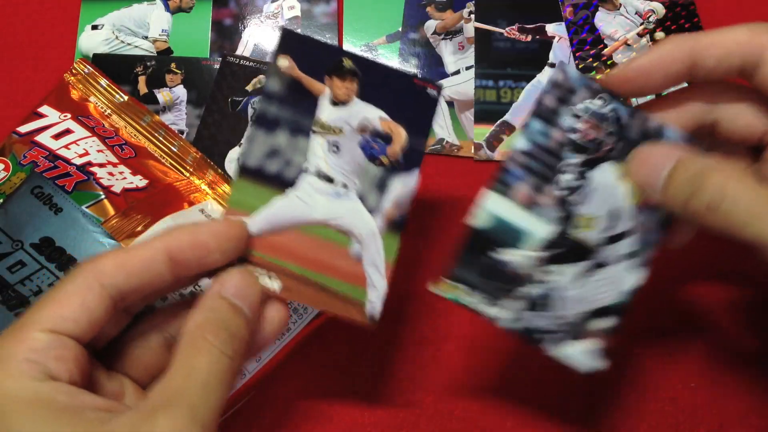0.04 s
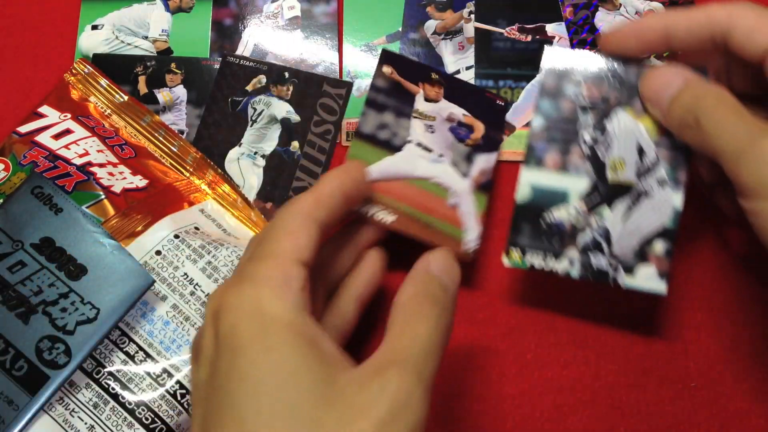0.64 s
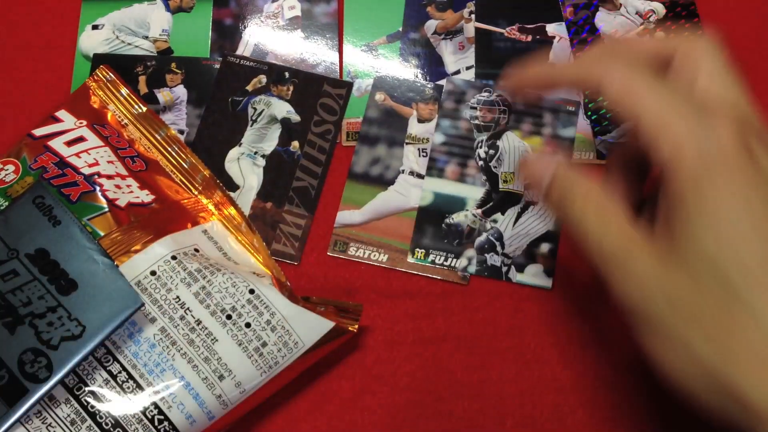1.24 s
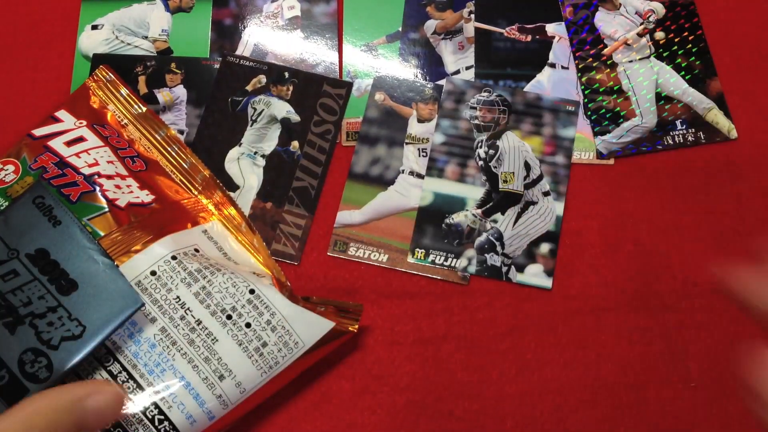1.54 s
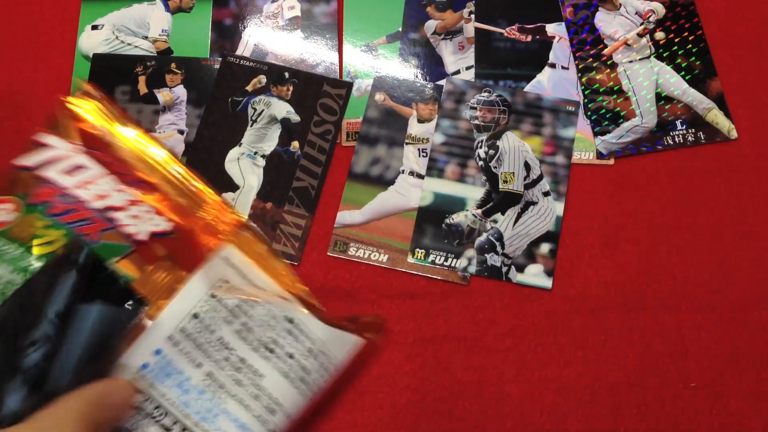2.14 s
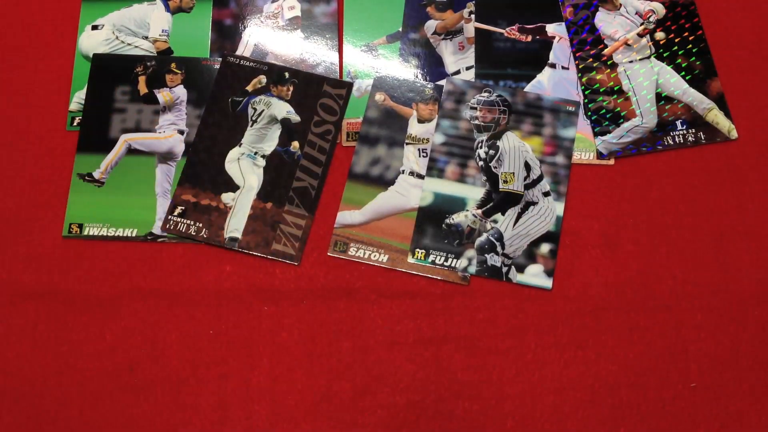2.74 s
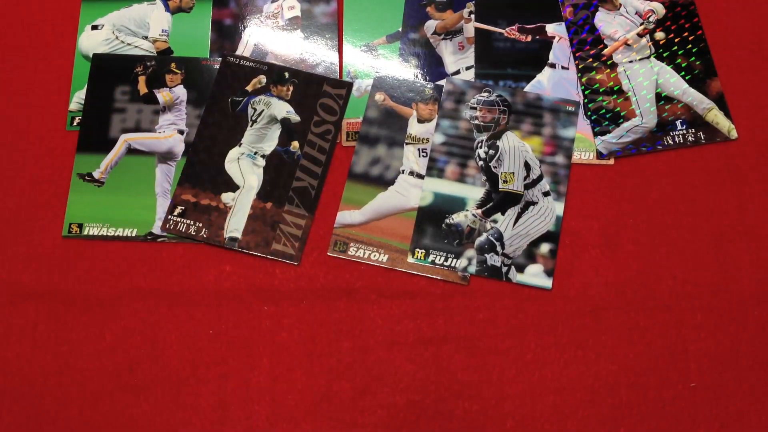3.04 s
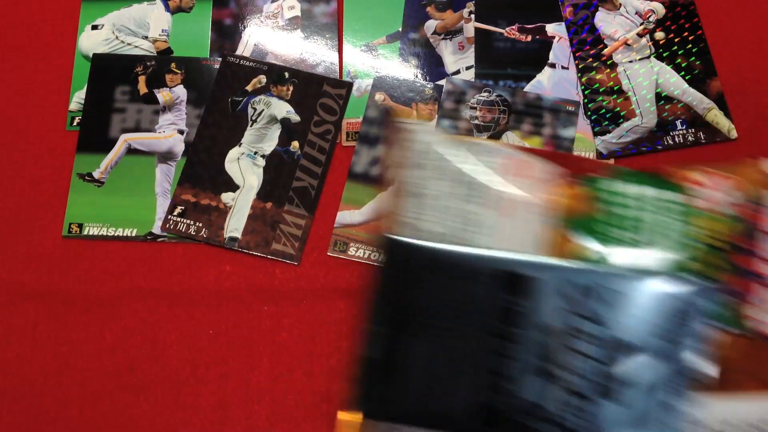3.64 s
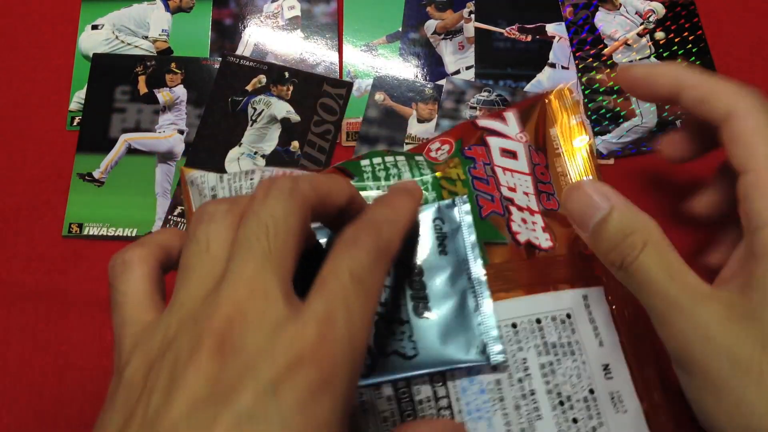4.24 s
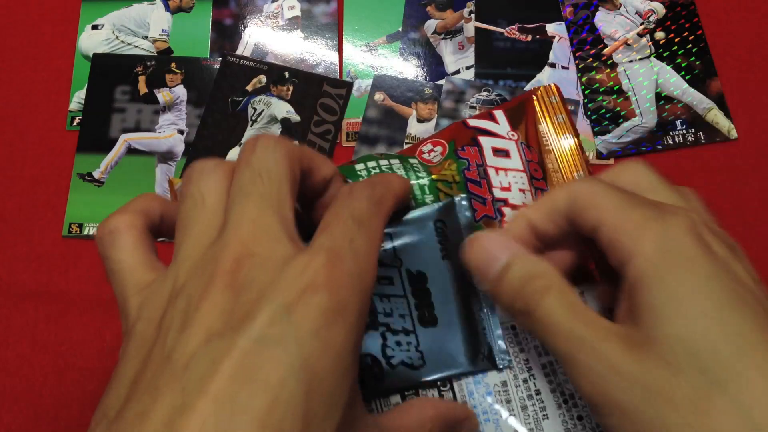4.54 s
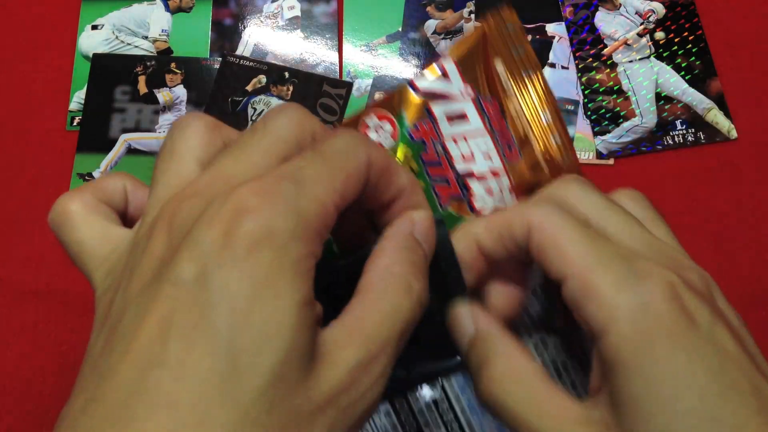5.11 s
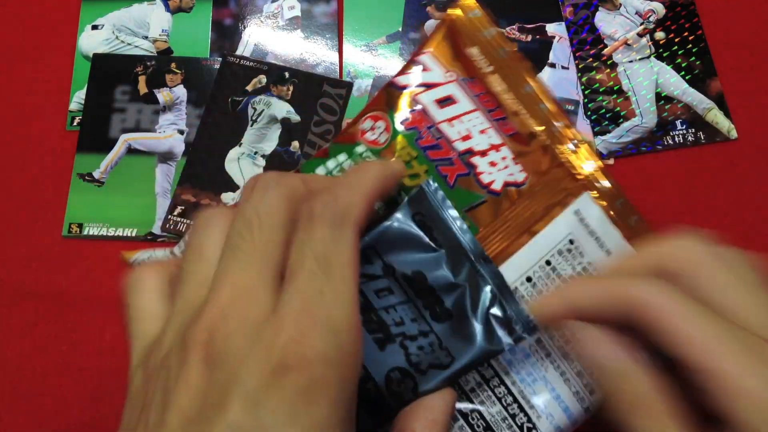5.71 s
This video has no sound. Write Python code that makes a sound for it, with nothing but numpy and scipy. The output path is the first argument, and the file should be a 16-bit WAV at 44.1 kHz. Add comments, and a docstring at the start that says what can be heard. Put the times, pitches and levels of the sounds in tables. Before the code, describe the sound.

Trading cards scrape and tap on a cloth-covered table, then a snack bag and foil packet crackle in someone's hands.

```python
"""Two trading cards scrape, squeak faintly and tap down on a cloth-covered table. A snack bag crackles in the
hands; at 2.476 s the crackle stops dead, echo and all, and later the hands crackle it again and pick at the
foil packet stuck to it. Creases in the film pop through one by one and ring the panel around them, over a fine
rustle of tiny slips. While the crackle is silent, a few knocks come from farther off in the small, quiet room.
Soft bumps on the table, a brief faint whistle and a low hiss lie underneath."""
import sys
import numpy as np
from scipy import signal
from scipy.fft import rfft, irfft, next_fast_len
from scipy.io import wavfile
from scipy.ndimage import uniform_filter1d

SR = 44100
rng = np.random.default_rng(int(sys.argv[2]) if len(sys.argv) > 2 else 0)


def dump(signal):
    """Clip the signal to [-1, 1] and save it as 16-bit WAV at the path in sys.argv[1]."""
    limited = np.clip(np.atleast_2d(signal).T, -1, 1)
    pcm = np.round(limited * 32767).astype(np.int16)
    wavfile.write(sys.argv[1], SR, pcm)


N = 258867
TIME = np.arange(N) / SR

# Hands and bag bump the table. Each row: start in seconds, level in dB, pitch in Hz.
TABLE_BUMPS = [(.952, -56.5, 167), (2.185, -56.5, 122), (2.338, -54.5, 122), (2.446, -58, 111),
               (5.211, -65, 135)]
# Fingers grip or push the film. Each row: start and length in seconds, then the relative levels
# in dB of the body (the lower rustle) and the fizz (the higher rustle).
FINGER_STROKES = [(1.576, 0.066, -50.5, -60), (1.69, 0.058, -67.5, -65.5), (1.743, 0.04, -54, -53),
                  (1.804, 0.065, -64, -69), (1.911, 0.09, -65, -62), (2.018, 0.18, -57, -58),
                  (2.16, 0.051, -47.5, -48.5), (2.227, 0.11, -56, -53), (2.331, 0.13, -55, -53.5),
                  (3.608, 0.016, -62, -74), (3.772, 0.09, -64, -68), (3.869, 0.045, -54, -57.5),
                  (4.029, 0.12, -72.5, -65), (4.152, 0.13, -50.5, -50.5), (4.311, 0.033, -67, -64),
                  (4.442, 0.114, -55, -64), (4.575, 0.04, -58, -48), (4.639, 0.15, -60.5, -63.5),
                  (4.804, 0.0507, -59.5, -64), (4.887, 0.18, -64.5, -70), (5.08, 0.054, -55.5, -53.5),
                  (5.138, 0.135, -54, -53), (5.363, 0.018, -52.5, -53), (5.411, 0.052, -57, -62.5),
                  (5.592, 0.021, -47, -60), (5.619, 0.055, -56, -57), (5.691, 0.04, -47, -46),
                  (5.83, 0.031, -70, -65)]


def amp(db):
    """Turns decibels into a factor to multiply by."""
    return 10 ** (np.asarray(db) / 20)


def evened(x):
    """Scales a signal to an average power of one."""
    return x / np.sqrt(np.mean(x ** 2) + 1e-20)


def value_at(points, hz):
    """Reads a curve at hz, along a logarithmic frequency axis."""
    freqs, values = np.transpose(points)
    return np.interp(np.log(hz + 1), np.log(freqs + 1), values)


def colour(x, points):
    """Makes each frequency louder or softer, following (Hz, dB) points."""
    size = next_fast_len(N + 4096)
    gain = amp(value_at(points, np.fft.rfftfreq(size, 1 / SR)))
    return irfft(rfft(x, size) * gain, size)[:N]


def add(mix, start, sound):
    """Mixes a sound in at a start given in seconds."""
    part = mix[round(start * SR):][:len(sound)]
    part += sound[:len(part)]


def gesture(start, length, attack_s, release_s):
    """A movement builds up, lasts until its length is over and dies away."""
    age = TIME - start
    rise = np.clip(age / attack_s, 0, 1)
    return rise * np.exp(-np.clip(age - length, 0, 30 * release_s) / release_s)


def background(level_db, waver_db, size=4096):
    """Low room noise and microphone hiss, wavering slightly and slowly swelling."""
    # The quiet room's tone. Each row: frequency in Hz, relative level in dB.
    air_tone = [(25, -31), (60, -26.5), (110, -15), (160, -8.5), (250, -7), (420, -11), (600, -13),
                (740, -17), (1050, -15.5), (1400, -16.5), (1900, -21.5), (2700, -22), (8000, -27),
                (9300, -29), (11000, -31.5), (14800, -23), (16000, -25)]
    # The room hiss slowly grows louder from start to end. Each row: time in seconds, boost in dB.
    swell = [(0, 0), (1.5, 0.5), (2.75, 2.5), (3.55, 5.5), (5.87, 7.5)]
    waver = evened(uniform_filter1d(uniform_filter1d(rng.standard_normal(N), size), size))
    swell_db = np.interp(TIME, *np.transpose(swell))
    air = evened(colour(rng.standard_normal(N), air_tone))
    return air * amp(level_db + swell_db + waver_db * waver)


def friction(per_s, spread_db, smooth):
    """Tiny slips of unequal size, each a burst of noise, over a smooth rub."""
    sizes = amp(spread_db * np.minimum(rng.exponential(1, N), 3))
    slips = sizes * (rng.random(N) < per_s / SR)
    power = signal.lfilter([1], [1, -np.exp(-1 / (0.00043 * SR))], slips ** 2)
    bursts = rng.standard_normal(N) * np.sqrt(power)
    return evened(bursts) + smooth * rng.standard_normal(N)


def card_scrapes():
    """Card fibres catch and slip as they slide over cards and cloth."""
    # Each row is one slide: start in seconds, length in seconds, level in dB.
    slides = [(0.0, 0.18, -84), (0.182, 0.021, -53.5), (0.259, 0.021, -59), (0.445, 0.12, -78),
              (0.628, 0.123, -54), (0.904, 0.076, -67.5)]
    # The tone of rubbed card. Each row: frequency in Hz, relative level in dB.
    card_tone = [(59, -64), (100, -34), (192, -12), (236, -8), (367, -14), (407, -5.5), (620, -8),
                 (1320, -3.5), (2370, -16), (5150, -18.5), (15000, -26)]
    fibres = friction(per_s=2400, spread_db=5, smooth=0.9)
    speed = sum(amp(db) * gesture(start, length, attack_s=0.048, release_s=0.0059)
                for start, length, db in slides)
    return evened(colour(fibres, card_tone)) * speed


def card_squeaks(width_hz):
    """Glossy card faces stick and slip, making a narrow, unsteady note."""
    # Each row is one squeak: start in seconds, length in seconds, level in dB, pitch in Hz.
    squeaks = [(0.2, 0.097, -81, 2230), (0.432, 0.17, -80.5, 2010), (0.645, 0.1, -56.5, 1250)]
    out = np.zeros(N)
    narrow = signal.butter(2, width_hz / 2, fs=SR, output="sos")
    for start, length, db, hz in squeaks:
        flutter = signal.sosfilt(narrow, rng.standard_normal(N) + 1j * rng.standard_normal(N))
        note = evened((flutter * np.exp(2j * np.pi * hz * TIME)).real)
        out += amp(db) * gesture(start, length, attack_s=0.015, release_s=0.009) * note
    return out


def pops(rows, tone_db, jump, stretch, panel_share, panel_cycles, size=2048):
    """Each pop is one sharp jump and a quick run of smaller slips; the panel around it rings briefly."""
    # Five ranges: bass, body and three of treble. Each row: low edge in Hz, high edge in Hz.
    bands = [(200, 450), (450, 1600), (1600, 4000), (4000, 8000), (8000, 16500)]
    # For each range, the seconds its ringing takes to fall to about a third.
    ring_times = [0.0053, 0.002, 0.0011, 0.00014, 0.00028]
    # A sharper pop lifts the treble. For each range, the dB gained per dB of brightness.
    bright_lift = [0.17, 0.039, 0.66, 1.22, 1.43]
    out, t = np.zeros(N), np.arange(size) / SR
    filters = [signal.butter(3, band, btype="band", fs=SR, output="sos") for band in bands]
    level_scale = np.sqrt(0.01 * SR / size)  # levels count as if the pop's energy filled 10 ms
    for start, body_db, bright_db, bass_db, hz, slip_s in rows:
        band_db = body_db + np.array(tone_db) + bright_db * np.array(bright_lift)
        band_db[0] += bass_db
        slips = rng.standard_normal(size) * np.exp(0.5 * rng.standard_normal(size))
        sound = np.zeros(size)
        for k, (sos, db, ring_s) in enumerate(zip(filters, band_db, ring_times)):
            run = slips * np.exp(-t / (stretch * slip_s + ring_s))
            run[0] = jump
            part = evened(signal.sosfilt(sos, run))
            if k == 1:  # the panel's note joins the body range, and bends as the panel settles
                age = t * hz / (panel_cycles * rng.uniform(0.51, 1.62))
                bent_hz = hz * (1 + 0.14 * rng.standard_normal() * (np.exp(-age) - 0.5))
                envelope = np.exp(-age) - np.exp(-5 * age)
                panel = envelope * np.sin(2 * np.pi * np.cumsum(bent_hz) / SR)
                part = evened(np.sqrt(1 - panel_share) * part + np.sqrt(panel_share) * evened(panel))
            sound += amp(db) * part
        add(out, start, level_scale * sound)
    return out


def card_taps():
    """The edges of the cards flick down and the card rings for a moment."""
    # Each row: start in seconds, body level in dB, brightness and bass in dB against the body,
    # panel pitch in Hz, slip time in seconds before stretching.
    taps = [(0.5231, -63, -6, -18, 1670, 0.0026), (0.7433, -52, -0.5, -10, 1040, 0.003),
            (0.8109, -61.5, -6, -23, 1070.0, 0.0013), (0.9315, -64, -1, -11, 1200, 0.0017),
            (0.9519, -57, -3, -8, 1540, 0.00092), (1.0006, -62, 2.5, -12, 1440.0, 0.0014),
            (1.0251, -64.5, -3, -18, 840, 0.0035)]
    # A tap's tone: a boost or cut in dB for each of the five ranges, low to high.
    tap_tone = [0.5, -0.5, 0.5, -0.2, -4.5]
    return pops(taps, tap_tone, jump=1.8, stretch=1.6, panel_share=0.64, panel_cycles=4.3)


def table_thumps(decay_s, size=8192):
    """The padded table answers each bump with a few low cycles."""
    out, t = np.zeros(N), np.arange(size) / SR
    swell = t / decay_s * np.exp(1 - t / decay_s)
    for start, db, hz in TABLE_BUMPS:
        add(out, start, amp(db) * swell * np.sin(2 * np.pi * hz * t))
    return out


def faint_ring(hz, db, fade_s):
    """Something on the table rings on after the first bump."""
    age = np.maximum(TIME - TABLE_BUMPS[0][0], 0)
    return amp(db - 60 * age / fade_s) * np.sin(2 * np.pi * hz * age)


def whistle(gain_db, waver_hz):
    """A thin, unsteady tone wanders high in the hiss."""
    # The tone's path. Each row: time in seconds, pitch in Hz, level in dB before gain_db is added.
    path = [(1.12, 9221, -97), (1.142, 9359, -96), (1.242, 7950, -87), (1.348, 8803, -88),
            (1.57, 8500, -94)]
    times, hz, db = np.transpose(path)
    waver = evened(uniform_filter1d(rng.standard_normal(N), 128))
    pitch = np.interp(TIME, times, hz) + waver_hz * waver
    sounding = (TIME > times[0]) & (TIME < times[-1])
    level = sounding * amp(np.interp(TIME, times, db) + gain_db)
    return level * np.sin(2 * np.pi * np.cumsum(pitch) / SR)


def film_rustle(body_gain_db, fizz_gain_db):
    """Broad wrinkles flex now and then; skin on film makes a much finer fizz."""
    # The tones of the wrinkles and of the fizz. Each row: frequency in Hz, relative level in dB.
    body_tone = [(70, -66), (170, 0.5), (400, -1), (850, 4.5), (1600, -3), (3000, -3), (6000, -38.5)]
    fizz_tone = [(1200, -49), (3200, 4.5), (6500, 5), (10000, -0.5), (15000, 2)]
    body = evened(colour(friction(per_s=490, spread_db=4, smooth=1), body_tone))
    fizz = evened(colour(friction(per_s=900, spread_db=3, smooth=0.55), fizz_tone))
    out = np.zeros(N)
    for start, length, body_db, fizz_db in FINGER_STROKES:
        push = gesture(start, length, attack_s=0.014, release_s=0.017)
        out += push * (body * amp(body_db + body_gain_db) + fizz * amp(fizz_db + fizz_gain_db))
    return out


def small_creases(per_s, spread_db, bass_db, slip_s, follow, count=16):
    """Rows for small, random pops: louder under a firmer grip, brighter where the film fizzes."""
    rows, usual_db = [], np.mean([stroke[2] for stroke in FINGER_STROKES])
    for start, length, body_db, fizz_db in FINGER_STROKES:
        places, pitches = rng.random((2, count))
        sizes, colours = rng.standard_normal((2, count))
        for k in range(count):
            age = (k + places[k]) / per_s
            if age < length:
                db = usual_db - 0.5 + follow * (body_db - usual_db) + spread_db * sizes[k]
                hz = np.interp(pitches[k], (0, 1), (610, 1250))
                bright_db = -7 + follow * (fizz_db - body_db) + spread_db * colours[k]
                rows.append((start + age, db, bright_db, bass_db, hz, slip_s))
    return rows


def film_crackle():
    """Creases in the film, large and small, pop through and ring the panel around them."""
    # The large creases. Each row: start in seconds, body level in dB, brightness and bass in dB
    # against the body, panel pitch in Hz, slip time in seconds before stretching.
    large = [(1.5922, -40, -12.5, -15, 1160.0, 0.0026), (1.6121, -34.5, -6, -11.5, 850, 0.0014),
             (1.6243, -35.5, -22, -11, 1160.0, 0.0044), (1.6326, -41, 6.5, -18, 1200, 0.00057),
             (1.7746, -39, -8, -18, 1220, 0.00073), (1.7843, -46.5, -8, -16, 750, 0.0027),
             (1.8053, -42.5, 2.5, -19, 764, 0.0016), (1.828, -49.5, -26, -25, 920, 0.003),
             (1.9124, -35, -2.5, -15.5, 1370, 0.0025), (1.9973, -41.5, -6, -9, 1160.0, 0.0016),
             (2.019, -48.5, 6.5, -18, 1690, 0.0013), (2.0495, -63, 12.5, -23, 1150, 0.0026),
             (2.061, -30, -9.5, -8, 1290.0, 0.0023), (2.1234, -71, 21, -8, 710.0, 0.00076),
             (2.1656, -41.5, -3.5, -28, 1480, 0.001), (2.1856, -33.5, -11, -12.5, 725, 0.001),
             (2.2724, -46.5, 6.5, -15, 1560, 0.00027), (2.2831, -58, 8, -14, 770, 0.00092),
             (2.3009, -41.5, 2.5, -11, 850, 0.0019), (2.3286, -43, -1, -7.5, 840.0, 0.0021),
             (2.3355, -31.5, -5.5, -15, 1340.0, 0.002), (2.4476, -43.5, -6.5, -4, 1580, 0.0016),
             (2.4632, -54, 6.5, 0.5, 560.0, 0.0013), (3.6282, -45, -5.5, -13, 1040, 0.0013),
             (3.6533, -40, 3, -5.5, 1510, 0.0014), (3.8023, -37.5, -9, -31, 1120.0, 0.002),
             (3.8334, -37.5, -14, -13, 800, 0.0041), (3.858, -47, -16, -15, 1420, 0.0015),
             (3.8809, -39, -10, -12.5, 790, 0.0015), (3.9061, -37.5, -15, -15, 780, 0.00067),
             (4.0001, -38, -2, -11.5, 640, 0.0013), (4.1332, -44, -9, -22, 920, 0.0032),
             (4.2155, -47.5, 3, -6.5, 1469, 0.0031), (4.2535, -37.5, -3, -14, 1205, 0.0028),
             (4.321, -51.5, -14, 2, 705, 0.0019), (4.3416, -43.5, -17, -9, 923, 0.0017),
             (4.3872, -44.5, -11.5, -17, 730, 0.0013), (4.3937, -44.5, -11.5, -14, 1140, 0.0017),
             (4.4527, -44, -1, -10, 1548, 0.0018), (4.4696, -45, -8, -13, 1144, 0.00092),
             (4.5231, -41.5, -20, -31, 948, 0.0022), (4.5431, -39, -3.5, -26, 742, 0.00063),
             (4.5853, -50.5, 5, -15, 710, 0.0045), (4.5979, -33.5, -15, -9.5, 950, 0.0034),
             (4.6075, -38, -0.5, -25, 1000, 0.001), (4.6161, -54, 6, -17, 975, 0.0013),
             (4.6325, -42.5, -4, -12, 936, 0.0025), (4.6752, -44.5, -25, -8, 990, 0.0019),
             (4.6869, -45.5, -9, -21, 752, 0.0026), (4.7088, -43.5, -3.5, -26, 920.0, 0.0013),
             (4.742, -51.5, 1.5, -17, 1040, 0.00069), (4.8118, -60, 14, -8, 916, 0.00098),
             (4.8238, -47.5, -1, -23, 760.0, 0.0015), (4.8842, -54, 2.5, -7, 840.0, 0.0011),
             (4.9149, -47, 8, -11.5, 820, 0.0015), (5.0044, -67, 18, -13, 720, 0.0027),
             (5.0697, -85, 25, 17, 670.0, 0.0011), (5.1211, -64.5, 14, -3, 969, 0.0016),
             (5.1478, -55, 9, -6, 840, 0.0011), (5.1633, -41.5, -10, -8, 905, 0.0016),
             (5.2072, -44.5, 1, -8, 660.0, 0.0013), (5.2259, -41, -2.5, -12, 650.0, 0.0021),
             (5.2395, -40, 0, -10, 1307, 0.0025), (5.2515, -49, 6, -4, 940.0, 0.0011),
             (5.3615, -48.5, -15, -4, 660, 0.003), (5.3718, -44.5, -9, -18, 686, 0.0022),
             (5.4173, -46.5, -7, -23, 955, 0.0013), (5.4255, -45.5, -5.5, -14, 1650.0, 0.0013),
             (5.4938, -38, -4, -16, 873, 0.0015), (5.5667, -57, 3.5, -16, 830.0, 0.0039),
             (5.5942, -40, -9.5, -14, 975, 0.0014), (5.6257, -40.5, -5, -20, 828, 0.0016),
             (5.651, -42, -7, -26, 934, 0.0022), (5.6654, -45, -6, -10, 810.0, 0.0019),
             (5.6805, -46, 7, -14, 943, 0.0014), (5.6929, -42.5, -5, -19, 770, 0.0019),
             (5.7087, -39, 1.5, -33, 870, 0.0022), (5.759, -51.5, 7, -27, 980, 0.0021),
             (5.829, -44, -1, -22, 1110, 0.0027), (5.8482, -71.5, 16, -18, 990.0, 0.0012)]
    # The film's tone: a boost or cut in dB for each of the five ranges, low to high.
    film_tone = [0.5, 0, 0, -0.13, -3.5]
    small = small_creases(per_s=38, spread_db=4, bass_db=-10, slip_s=0.0015, follow=0.51)
    return pops(list(large) + small, film_tone, jump=2.76, stretch=1.1,
                panel_share=0.54, panel_cycles=2.36)


def far_knocks(gain_db):
    """Things knock as they are handled away from the table."""
    # Each row: start in seconds, relative body level in dB, brightness and bass in dB against
    # the body, panel pitch in Hz, slip time in seconds before stretching.
    knocks = [(2.5836, -52.5, -2.5, -10, 595, 0.00094), (2.8384, -53, -1, -2, 1110, 0.004),
              (2.8692, -52, -5.5, -5, 580, 0.0035), (3.0142, -56, -28, -14, 518, 0.0029),
              (3.2459, -68.5, 9, -17, 950, 0.0019), (3.255, -78, 6, -17, 1350.0, 0.0015),
              (3.3505, -54, -16, -11, 1190, 0.0011), (3.3685, -58.5, -8, -15, 1220.0, 0.0024),
              (3.4179, -61.5, 3.5, -18, 1400, 0.0012)]
    # A knock's tone: a boost or cut in dB for each of the five ranges, low to high.
    knock_tone = [1.5, 1, 3.5, 0.3, -9]
    sound = pops(knocks, knock_tone, jump=4, stretch=1.36, panel_share=0.59, panel_cycles=1.76)
    return amp(gain_db) * sound


def room(x, early_db, tail_db, early_s=0.0047, turn_hz=3.7, size=16384, paths=3):
    """Quick echoes from table and hands, then a short tail; the paths change as the source turns."""
    # The room's echo. Each row: frequency in Hz, seconds to fade by 60 dB.
    fade_times = [(150, 0.29), (500, 0.16), (1500, 0.16), (4000, 0.14), (9000, 0.14), (13000, 0.13),
                  (16000, 0.14)]
    t, out = np.arange(size) / SR, x.copy()
    for k in range(paths):
        near, far = rng.standard_normal((2, size)) * (rng.random((2, size)) < 9000 / SR)
        near *= (t > 0.002) * np.exp(-t / early_s)
        hz, age, spectrum = signal.stft(far * (t > 0.006), SR, nperseg=256)
        fade = amp(-60 * age / value_at(fade_times, hz)[:, None])
        tail = signal.istft(spectrum * fade, SR, nperseg=256)[1][:size]
        echoes = (amp(early_db) * evened(near) + amp(tail_db) * evened(tail)) / np.sqrt(size)
        facing = np.sqrt(2 / paths) * np.cos(2 * np.pi * (turn_hz * TIME + k / paths))
        out += signal.fftconvolve(x * facing, echoes)[:N]
    return out


def scene():
    """Cards on the table, film close to the microphone, knocks farther off."""
    cards = card_scrapes() + card_taps() + card_squeaks(width_hz=230)
    table = room(cards, early_db=-18, tail_db=-10.5) + faint_ring(hz=856, db=-67, fade_s=1.0)
    knocks = room(far_knocks(gain_db=-1), early_db=-9.5, tail_db=-6)
    quiet = background(level_db=-70.5, waver_db=-0.83) + whistle(gain_db=4, waver_hz=70)
    film = film_rustle(body_gain_db=0.5, fizz_gain_db=-1) + film_crackle()
    handling = room(film, early_db=-15.5, tail_db=-12) + table_thumps(decay_s=0.007)
    handling *= (TIME < 2.476) | (TIME > 3.4179)  # the first crackle stops dead, echo and all
    return (table + handling + knocks + quiet)[None]


def record(dry):
    """The microphone colours the sound, and the very highest treble is cut off."""
    # The microphone's tone. Each row: frequency in Hz, boost or cut in dB.
    mic_tone = [(70, -6.5), (140, -1.5), (230, -2.5), (320, -1), (480, -3.5), (630, 1.5), (1000, 2),
                (1500, -1), (1950, 3), (2700, -0.5), (4400, 2), (5200, 2.5), (7000, 1.5), (9500, -1),
                (12500, 2.5), (15500, -8)]
    treble_cut = signal.firwin(255, 15600, window=("kaiser", 7), fs=SR)
    return signal.oaconvolve(colour(dry[0], mic_tone), treble_cut, "same")[None]


dry = scene()
out = record(dry)
dump(out)
```